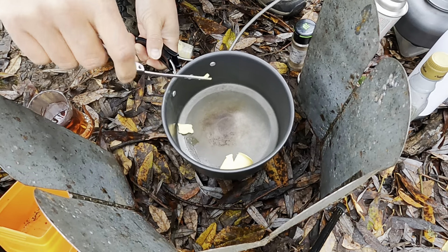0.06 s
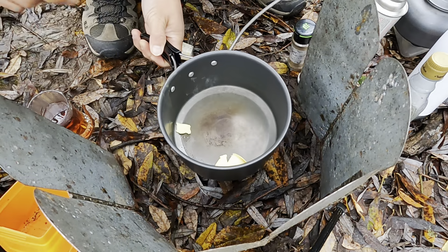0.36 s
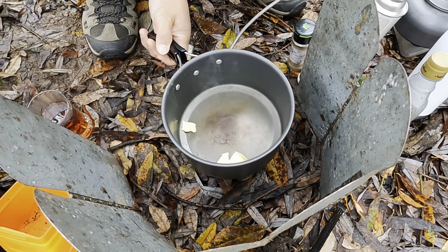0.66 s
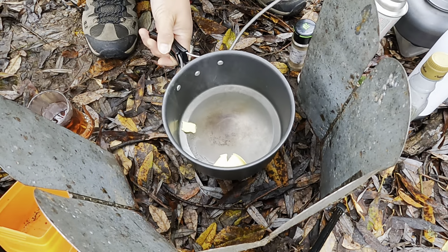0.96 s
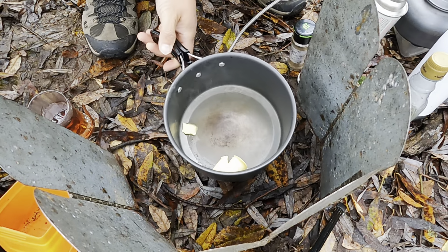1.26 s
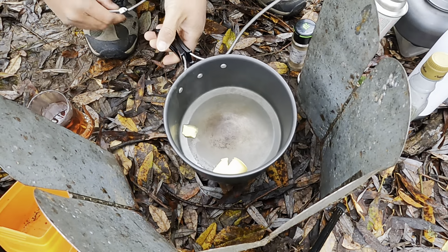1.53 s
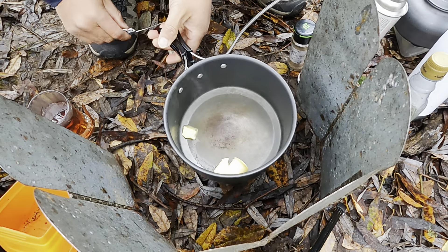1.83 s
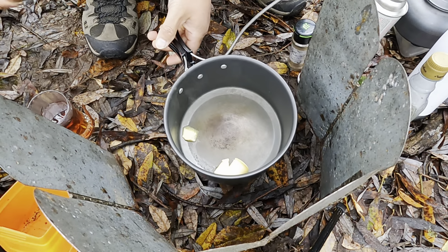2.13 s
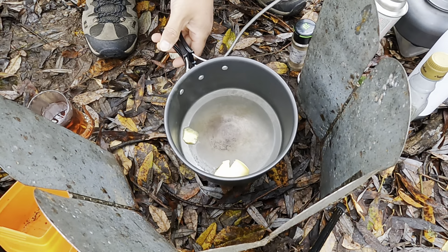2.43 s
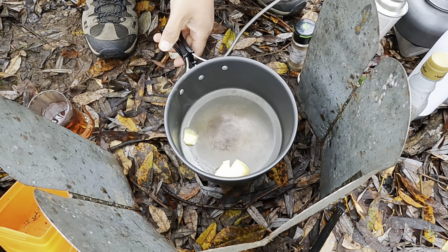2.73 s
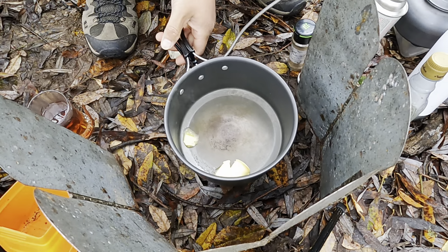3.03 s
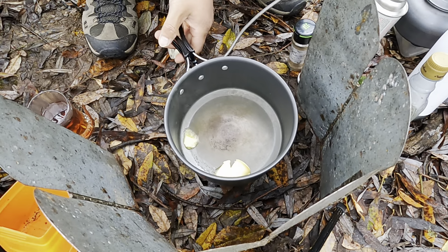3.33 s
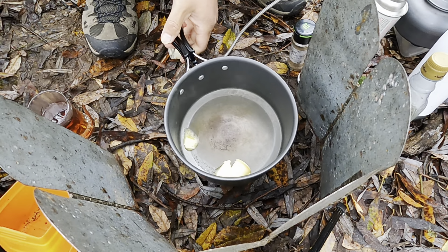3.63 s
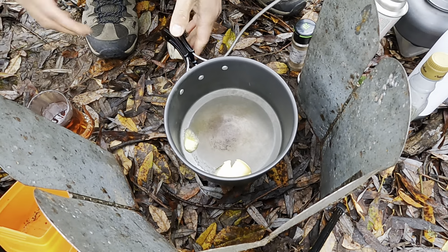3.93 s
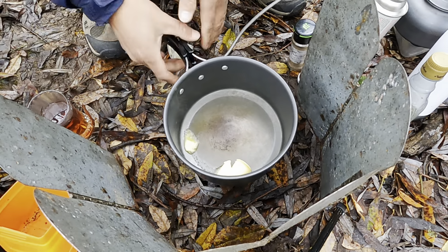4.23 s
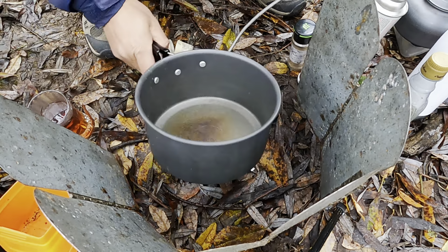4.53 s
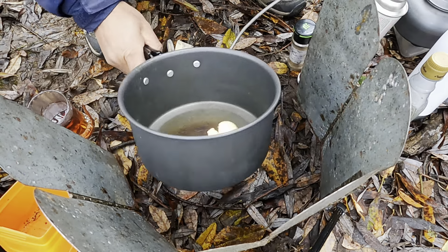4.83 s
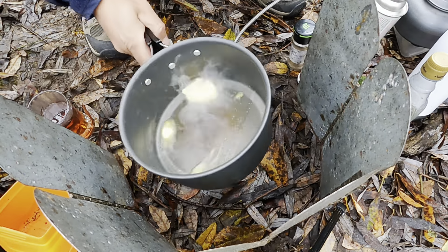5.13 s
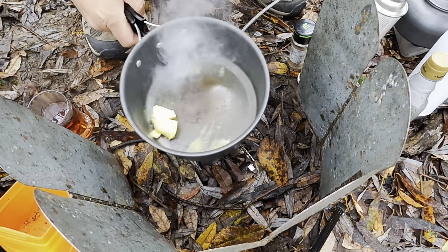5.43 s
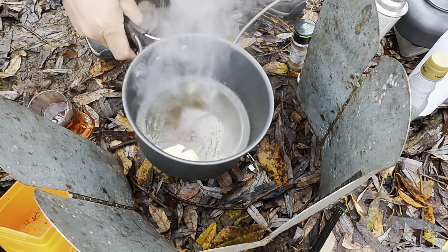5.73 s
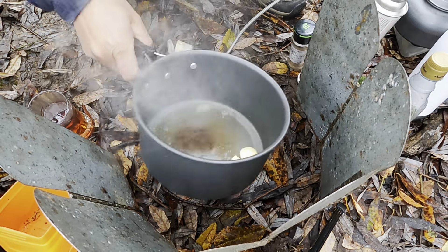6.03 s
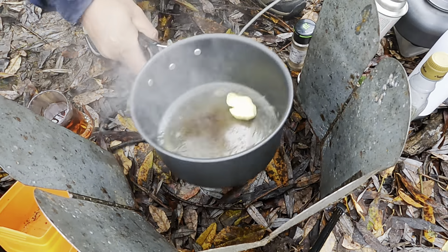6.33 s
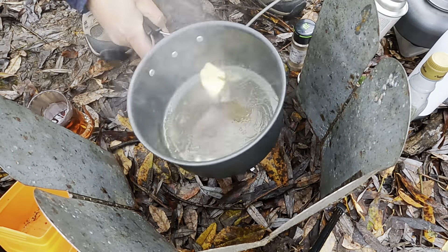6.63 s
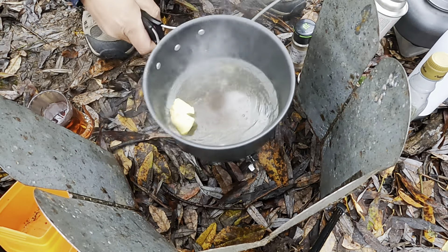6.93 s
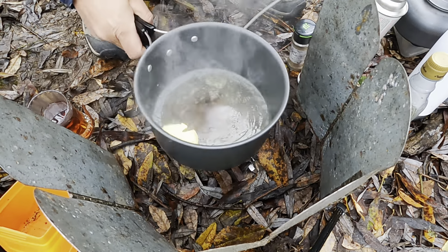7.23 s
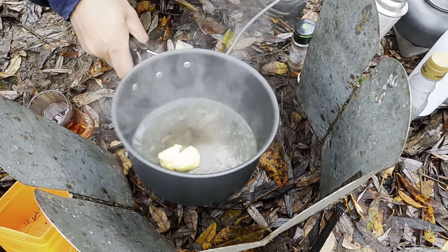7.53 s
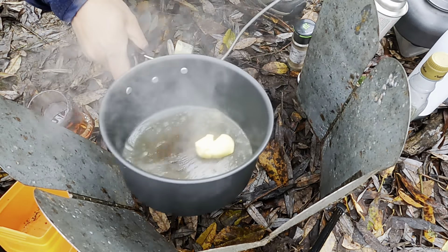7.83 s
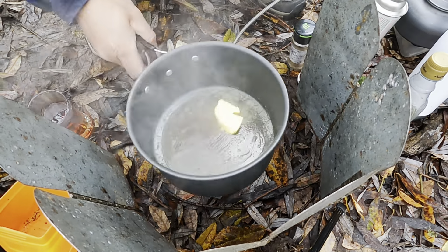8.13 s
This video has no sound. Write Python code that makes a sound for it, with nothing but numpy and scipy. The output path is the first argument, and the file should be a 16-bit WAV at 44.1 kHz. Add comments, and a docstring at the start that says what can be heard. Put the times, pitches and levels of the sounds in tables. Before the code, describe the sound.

A light fizz of melting butter with a few pot knocks and handle clicks, then loud surging sizzling as the pot is swirled.

```python
"""Butter sizzles in a small aluminium pot on a gas camping burner, outdoors, heard from just above.
Water boiling out of the pats fizzes, spits, plops and sings as steam over the flame's low rumble.
The pot scrapes and knocks on the burner's prongs and its folding handle clacks. Then it is lifted
and swirled: the melted fat runs over the hot base and fries much harder."""
import sys
import numpy as np
from scipy import signal
from scipy.fft import rfft, irfft, next_fast_len
from scipy.io import wavfile
from scipy.ndimage import uniform_filter1d, minimum_filter1d, map_coordinates

SR = 44100
rng = np.random.default_rng(int(sys.argv[2]) if len(sys.argv) > 2 else 0)


def master(y):
    """Save y as 16-bit WAV."""
    cut = np.clip(np.atleast_2d(y).T, -1, 1)
    pcm = np.round(cut * 32767)  # scale
    wavfile.write(sys.argv[1], SR, pcm.astype(np.int16))


N = 369558

# Spectra: freq_hz, gain_db
FLAME_EQ = [(15, -5.5), (30, -0.5), (80, 2), (115, -4.5), (190, -8), (270, -18.5), (380, -23.5),
            (600, -20.5), (1100, -20.5), (2500, -41), (8000, -50)]
HINGE_EQ = [(300, -11), (2600, -18), (3600, -1), (4400, -1), (5300, 4), (6800, -4), (9400, -10),
            (11000, -20), (15000, -38)]
RATTLE_EQ = [(80, -17), (190, -0.5), (400, -1.5), (600, -7), (850, -4.5), (1150, 2), (1750, -6),
             (2350, -2.5), (3000, -4), (5000, 0.5), (9000, -41)]
RASP_EQ = [(200, -35.5), (420, -18.5), (555, 4), (680, -2), (790, -10.5), (920, -10), (1060, -26),
           (1300, -19.5), (1500, -14), (1900, -29), (2600, -26), (3500, -50), (9000, -26), (14000, -55)]
THUD_EQ = [(100, -20), (300, -46), (420, -23.5), (550, 6.5), (660, 3), (760, -11), (900, -8), (1100, -31),
           (1800, -34), (3000, -24.5), (6000, -59), (12000, -86)]
CLANK_EQ = [(150, -15.5), (400, -7), (600, 4), (850, -4), (1060, -5), (1220, -4), (1600, -19),
            (2050, -18.5), (2600, -13.5), (3500, -22), (4300, -10), (5400, -15.5), (6800, -21),
            (14000, -38)]
FIZZ_EQ = [(1500, -34), (3000, -13), (4200, -8.5), (5400, -1), (6400, -1), (7600, 0.5), (8100, -3),
           (9800, -1.5), (10600, -7.5), (11500, -14.5), (13000, -18.5), (14400, -23), (15300, -36),
           (15800, -60)]
COARSE_EQ = [(200, -31.5), (320, -38), (440, -13), (600, -2), (800, -5), (1050, -8.5), (1300, -12.5),
             (1750, -5.5), (2100, -5), (2300, 0.5), (3300, -1), (4200, 4.5), (5500, 2), (8000, -52),
             (12000, -38)]
CRACKLE_EQ = [(800, -27), (2300, -5.5), (4500, -2.5), (9500, -3.5), (11500, -10), (14500, -19),
              (15800, -33)]
WINDSHIELD_EQ = [(600, -13), (1400, -5), (2800, 0), (5000, -2), (8500, -5), (12000, 0)]
# Metal modes: freq_hz, level_db, t60_s
WIRE_MODES = [(400, -3.5, 0.11), (1200, 0, 0.025), (2278, -2, 0.17), (3350, 9, 0.044), (3760, -2, 0.16),
              (4830, -15, 0.044), (5000, 0, 0.034), (6750, -1, 0.052), (8980, 5.5, 0.034)]
WALL_MODES = [(545, -12.5, 0.084), (641, 1.5, 0.063), (821, -11.5, 0.13), (910, -17.5, 0.19),
              (1265, -13, 0.045), (1540, -7, 0.078), (2440, -16.5, 0.064), (2750, -24, 0.14),
              (4100, -19, 0.034), (5400, -17, 0.033)]
# Air in the pot: freq_hz, width_hz, gain_db
AIR_MODES = [(556, 55, -6.5), (1514, 52, 7), (2285, 64, -5)]
# Steam from under the pats: start_s, end_s, pitch_hz, width_hz, level_db
STEAM_NOTES = [(0, .11, 10000, 2240, -42), (0, 2, 5360, 400, -45.5), (.1, 2.4, 2770, 400, -55),
               (2.1, 3.4, 2800, 400, -55), (2.2, 4, 6520, 350, -44), (2.4, 2.5, 9040, 250, -52),
               (4.441, 4.56, 6400, 1500, -40.5)]
# Handle hinges: start_s, level_db, body_relative_db, left_minus_right_db
HANDLE_CLACKS = [(3.411, -15, -8, 5), (3.461, -18, 6.5, 4), (3.4833, -11.5, -1.5, 3.5),
                 (3.5026, -20, -1, 6), (4.32, -19, 0, -5)]
# Pot sliding on the prongs, or butter in the pot: start_s, length_s, level_db
SCRAPES = [(0.041, 0.18, -37.5), (0.13, 0.037, -31), (0.365, 0.05, -44), (1.267, 0.17, -38.5),
           (2.136, 0.18, -42), (4.233, 0.082, -34.5), (4.313, 0.089, -30), (4.78, 0.076, -52),
           (4.85, 0.13, -37), (6.359, 0.09, -38.5), (6.532, 0.1, -37.5), (7.708, 0.067, -39),
           (7.859, .12, -39)]
# Pot hitting the prongs: start_s, level_db, clank_relative_db
KNOCKS = [(.637, -15, 3), (.658, -14.5, -4.5), (0.7349, -20.5, -6), (1.257, -10.5, -9), (1.2755, -25, -27),
          (1.499, -24.5, -2), (1.695, -40, -30), (2.957, -36, -9.5), (4.277, -26, 1.5), (4.329, -28.5, 4.5),
          (4.3983, 1.5, -15), (4.438, -24, -1), (4.941, -24, -22), (5.045, -28.5, -17)]
# Water drops in the fat: start_s, level_db, pitch_hz
SPITS = [(1.829, -21.5, 5430), (2.76, -15, 8500), (3.314, -20, 4230), (3.613, -19, 6450),
         (4.478, -18, 6240), (4.519, -16, 6860), (5.31, -12, 9000), (8.090, -12, 6300),
         (8.339, -19.5, 4670)]
# Big steam bubbles: start_s, level_db
PLOPS = [(5.485, -33), (6.729, -26.5), (6.858, -28.5), (6.94, -29), (7.089, -30), (7.26, -27.5),
         (7.427, -32.5), (7.955, -35.5), (8.318, -31)]
# Frying while the pot stands on the burner: time_s, level_db
SIMMER = [(0, -44), (.45, -38), (.8, -42), (1.45, -41.5), (2.0, -35.5), (2.7, -31.5), (3.4, -36.5),
          (3.95, -35.5), (4.25, -32.5), (4.52, -37), (4.62, -41.5), (4.8, -38.5)]
# Swirls wash fat over bare metal: crest_s, length_s, fizz_boost_db, coarse_boost_db
SWIRLS = [(4.761, 0.25, -0.5, 11.5), (5.126, 0.42, 4.5, 1.5), (5.785, .2, 1, 1.5), (6.642, 0.94, 6.5, 2),
          (7.812, 0.38, 4.5, -0.5)]
# Phase between the microphone ports: freq_hz, right_lead_rad
PORT_LEAD = [(1000, 0), (2070, .2), (3300, .75), (4200, .45), (7500, .3), (8800, 0)]
# Level between the ports: freq_hz, left_minus_right_db
PORT_BALANCE = [(100, -.5), (700, -2.3), (1400, -1.6), (4400, -1.8), (8100, -1), (15000, 0)]
# Sizzle layers: offset_db, simmer_share, spread_boost_db, drying_db_per_s
FIZZ_LAYER, COARSE_LAYER = (1, 0.93, 14, 1.9), (-10.5, -0.04, 16.5, 1.74)
HOLLOW_LAYER = (-26, .3, 21, 0.9)

TILT_S, SPREAD_S, SWIRL_RISE_SHARE = 4.785, 0.18, .35
SIMMER_BUBBLES_PER_S, RATE_DOUBLING_DB = 1500, 6.5
FRESH_BUBBLES_PER_S, FRESH_DECAY_S = 6000, 1.3
FLICKER_DB, TOP_HZ = 1.2, 15760


def amp(db):
    """Decibels to gain."""
    return 10 ** (np.asarray(db) / 20)


def unit_rms(x):
    """Scale to rms 1."""
    return x / np.sqrt(np.mean(x ** 2) + 1e-20)


def unit_peak(x):
    """Scale to peak 1."""
    return x / np.abs(x).max()


def log_interp(points, hz):
    """Read (freq_hz, value) points on a log axis."""
    freqs_hz, values = np.transpose(points)
    return np.interp(np.log(hz + 1), np.log(freqs_hz + 1), values)


def add(track, start_s, sound):
    """Mix a sound in at start_s."""
    room = track[..., round(start_s * SR):][..., :sound.shape[-1]]
    room += sound[..., :room.shape[-1]]


def wobble(knots_per_s):
    """Smooth random curve."""
    at = np.arange(0, N, 16)
    curve = map_coordinates(rng.standard_normal(N // 20), [at * knots_per_s / SR], mode="wrap")
    return np.interp(np.arange(N), at, curve)


def swell(length_s):
    """Rounded rise and fall."""
    return np.abs(np.sin(np.linspace(0, np.pi, int(length_s * SR)))) ** 0.25


def filtered(x, response):
    """Apply a complex response(hz)."""
    n = x.shape[-1]
    n_fft = 2 * next_fast_len(n // 2 + SR // 20, real=True)
    return irfft(rfft(x, n_fft) * response(np.fft.rfftfreq(n_fft, 1 / SR)), n_fft)[..., :n]


def eq_response(points, hz):
    """Minimum-phase response through (freq_hz, gain_db) points."""
    cepstrum = irfft(np.log(amp(log_interp(points, hz))))
    cepstrum[1:len(hz) - 1] *= 2
    cepstrum[len(hz):] = 0
    return np.exp(rfft(cepstrum))


def eq(x, points):
    """Apply a minimum-phase EQ."""
    return filtered(x, lambda hz: eq_response(points, hz))


def resonances(modes, hz):
    """Summed band-pass response of (freq_hz, width_hz, gain_db) modes."""
    return sum(amp(db) * 1j * hz * width_hz / (mode_hz ** 2 - hz ** 2 + 1j * hz * width_hz)
               for mode_hz, width_hz, db in modes)


def grains(rate_per_s, spread_db):
    """Random impulses of log-normal size; rms 1."""
    fires = rng.random(N) < rate_per_s / SR
    size = amp(spread_db * np.minimum(rng.standard_normal(N), 2.5))
    return unit_rms(fires * size * rng.choice([-1, 1], N) / np.sqrt(rate_per_s))


def burst(t60_s):
    """Decaying puff of noise."""
    t = np.arange(SR // 4) / SR
    return rng.standard_normal(len(t)) * amp(-60 * t / t60_s)


def ringing(modes, t):
    """Struck modes; strengths vary per blow, neighbours swing in opposite senses."""
    return sum((-1) ** k * amp(db + rng.normal(0, 1.0) - 60 * t / t60_s) * np.sin(2 * np.pi * hz * t)
               for k, (hz, db, t60_s) in enumerate(modes))


def ping(hz, decay_cycles, t):
    """One tiny bubble rings."""
    return np.sin(2 * np.pi * hz * t) * np.exp(-hz * t / decay_cycles)


def pings(centre_hz, log_spread, decay_cycles, spread_db, count):
    """Bubbles burst at random times, pitches and sizes; rms 1."""
    start = rng.integers(0, N, (count, 1))
    pitch, size = np.clip(rng.standard_normal((2, count, 1)), -2.5, 2.5)
    k = np.arange(SR // 400)
    rings = amp(spread_db * size) * ping(centre_hz * np.exp(log_spread * pitch), decay_cycles, k / SR)
    return unit_rms(np.bincount((start + k).ravel(), rings.ravel(), N)[:N])


def burner():
    """The gas flame rumbles, low and steady with a slight flicker."""
    common = rng.standard_normal(N)
    per_side = eq(rng.standard_normal((2, N)), [(70, -19), (150, -13), (300, -9)])
    return amp(-47.5 + FLICKER_DB * wobble(7)) * unit_rms(eq(common + per_side, FLAME_EQ))


def steam():
    """Vapour flutters out from under a pat; each fuzzy note lasts until its channel melts away."""
    out = np.zeros(N)
    for start_s, end_s, pitch_hz, width_hz, db in STEAM_NOTES:
        flow = swell(end_s - start_s)
        noise = rng.standard_normal(len(flow))
        note = filtered(noise, lambda hz: resonances([(pitch_hz, width_hz, 0)], hz) ** 2)
        add(out, start_s, amp(db + 1) * flow * unit_rms(note))
    return out * amp(1.5 * wobble(12))


def handle():
    """The folding handle shifts: bright hinge click, ringing wire, duller rattle."""
    out, t = np.zeros((2, N)), np.arange(SR // 4) / SR
    for start_s, db, body_db, pan_db in HANDLE_CLACKS:
        click = unit_peak(eq(burst(t60_s=0.048), HINGE_EQ))
        wire = unit_peak(eq(ringing(WIRE_MODES, t), [(2400, body_db), (3200, 0)]))
        rattle = unit_peak(eq(burst(t60_s=0.1), RATTLE_EQ))
        clack = amp(4) * click + amp(-1) * wire + amp(body_db) * rattle
        add(out, start_s, amp([[db + pan_db / 2], [db - pan_db / 2]]) * clack)
    return out


def scrapes():
    """The base sticks and slips on the prongs, rasping and ringing the wall."""
    pressure, t = np.zeros(N), np.arange(SR // 10) / SR
    for start_s, length_s, db in SCRAPES:
        add(pressure, start_s, amp(db) * swell(length_s))
    slips = grains(1200, spread_db=1.5)
    slip_ring = eq(ringing(WALL_MODES, t), [(300, -10), (520, -2), (850, -5.5), (1400, -0.5)])
    wall = unit_rms(signal.oaconvolve(slips, slip_ring)[:N])
    rasp = unit_rms(eq(slips, RASP_EQ))
    return pressure * (amp(-2.5) * rasp + amp(-11.5) * wall)


def knocks():
    """A knock pushes the base like a drum skin, clanks on the prong and briefly rings the wall."""
    out, t = np.zeros(N), np.arange(SR // 4) / SR
    thud = unit_peak(eq(1. * (t == 0), THUD_EQ))
    attack = 1 - np.exp(-t / 0.0013)
    for start_s, db, clank_db in KNOCKS:
        # a flat blow hardly stirs the wall's middle modes
        wall_eq = [(250, -22.5), (500, 0.33 * clank_db), (900, 1.5 * clank_db),
                   (1500, 2.06 * clank_db), (2400, 0.26 * clank_db)]
        wall = eq(ringing(WALL_MODES, t) * attack, wall_eq)
        clank = unit_peak(eq(burst(t60_s=0.046), CLANK_EQ))
        add(out, start_s, amp(db) * (thud + amp(-0.5) * wall + amp(clank_db - 1) * clank))
    return out


def spatter():
    """Water drops spit sharply; big steam bubbles plop and sound the pot's air."""
    out, t = np.zeros(N), np.arange(SR // 4) / SR
    for start_s, db, pitch_hz in SPITS:
        spray = unit_peak(eq(burst(t60_s=0.018), FIZZ_EQ))
        add(out, start_s, amp(db) * (.9 * ping(pitch_hz, decay_cycles=9.1, t=t) + .5 * spray))
    for start_s, db in PLOPS:
        puff = burst(t60_s=0.0074)
        plop = filtered(puff, lambda hz: eq_response(CLANK_EQ, hz) * (1 + 4 * resonances(AIR_MODES, hz)))
        add(out, start_s, amp(db + 3) * unit_peak(plop))
    return out


def frying_curves():
    """The fat simmers, spreads as the pot tilts, surges with each swirl and slowly dries."""
    t = np.arange(N) / SR
    simmer_db = np.interp(t, *np.transpose(SIMMER))
    mean_db = simmer_db[t < TILT_S].mean()
    spread = np.clip((t - TILT_S) / SPREAD_S, 0, 1)
    levels_db = []
    for offset_db, simmer_share, boost_db, drying_db_per_s in (FIZZ_LAYER, COARSE_LAYER, HOLLOW_LAYER):
        standing_db = mean_db + offset_db + simmer_share * (simmer_db - mean_db)
        levels_db.append(standing_db + spread * (boost_db - drying_db_per_s * (t - TILT_S)))
    fizz_db, coarse_db, hollow_db = levels_db
    for crest_s, length_s, fizz_boost_db, coarse_boost_db in SWIRLS:
        start_s = crest_s - SWIRL_RISE_SHARE * length_s
        wash = np.interp(t, [start_s, crest_s, start_s + length_s], [0, 1, 0])
        fizz_db += fizz_boost_db * wash
        coarse_db += coarse_boost_db * wash
    base_rate_per_s = SIMMER_BUBBLES_PER_S * 2 ** ((fizz_db - mean_db) / RATE_DOUBLING_DB)
    base_rate_per_s += FRESH_BUBBLES_PER_S * np.exp(-t / FRESH_DECAY_S)
    return fizz_db, coarse_db, hollow_db, base_rate_per_s


def sizzle():
    """Water boils out of the butter: films snap, tiny bubbles ping, coarser ones ring the pot's air."""
    fizz_db, coarse_db, hollow_db, base_rate_per_s = frying_curves()
    # fewer bubbles: single ones and clusters stand out more
    sparseness = (3300 / base_rate_per_s) ** 0.42
    clusters_db = (0.87 * wobble(22) + wobble(90) + 0.9 * wobble(450)) * sparseness
    snaps = unit_rms(eq(grains(1.2 * base_rate_per_s, spread_db=2), FIZZ_EQ))
    bubbles = pings(centre_hz=7390, log_spread=0.286, decay_cycles=4.3, spread_db=7.5, count=12000)
    bubbles = unit_rms(eq(bubbles, FIZZ_EQ))
    cracks = unit_rms(eq(grains(80, spread_db=3), CRACKLE_EQ))  # trapped droplets flash to steam
    fizz = unit_rms(snaps + amp(-2.5) * sparseness * bubbles + amp(-12) * cracks) * amp(clusters_db)
    coarse = eq(grains(.6 * base_rate_per_s, spread_db=3.5), COARSE_EQ)
    coarse *= amp(0.31 * clusters_db + 1.4 * wobble(35))
    hollow = filtered(grains(.3 * base_rate_per_s, spread_db=5.5), lambda hz: resonances(AIR_MODES, hz))
    hollow *= amp(1.8 * wobble(9))
    return (amp(fizz_db) * unit_rms(fizz) + amp(coarse_db) * unit_rms(coarse)
            + amp(hollow_db) * unit_rms(hollow))


def reflections(x, wet_db, t60_s):
    """Pot wall and windshield scatter a very short echo, different at each port."""
    tails = np.array([burst(t60_s), burst(t60_s)])
    tails = np.pad(tails / np.linalg.norm(tails[0]), ((0, 0), (SR // 1000, 0)))  # 1 ms delay
    return x + amp(wet_db) * signal.fftconvolve(x[None], eq(tails, WINDSHIELD_EQ), axes=1)[:, :N]


def port_response(hz):
    """The pot sits slightly right: the right port hears it earlier and louder."""
    sides = np.array([[.5], [-.5]])
    return amp(sides * log_interp(PORT_BALANCE, hz)) * np.exp(-1j * sides * log_interp(PORT_LEAD, hz))


def limiter(x, ceiling, release_db_per_s):
    """Peaks above the ceiling pull the gain down; it climbs back steadily."""
    over_db = 20 * np.log10(np.maximum(np.abs(x).max(axis=0) / ceiling, 1))
    climb_db = release_db_per_s * np.arange(N) / SR
    cut_db = np.maximum.accumulate(over_db + climb_db) - climb_db
    return x * uniform_filter1d(minimum_filter1d(amp(-cut_db), size=130), size=130)


def scene():
    """Butter and pot with their echo, plus handle and flame, in stereo."""
    pot = sizzle() + steam() + spatter() + scrapes() + knocks()
    pot = reflections(pot, wet_db=-8, t60_s=.025)
    return filtered(pot, port_response) + handle() + burner()


def record(dry):
    """Limit the loudest knock, then cut everything above TOP_HZ."""
    return filtered(limiter(dry, ceiling=0.58, release_db_per_s=64), lambda hz: hz < TOP_HZ)


dry = scene()
out = record(dry)
master(out)
```